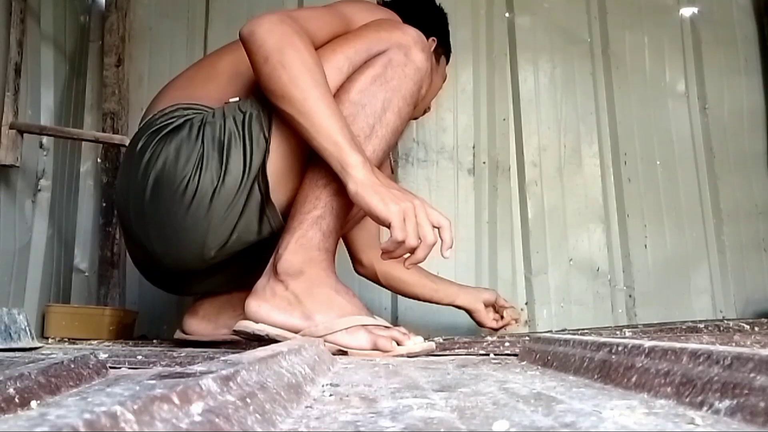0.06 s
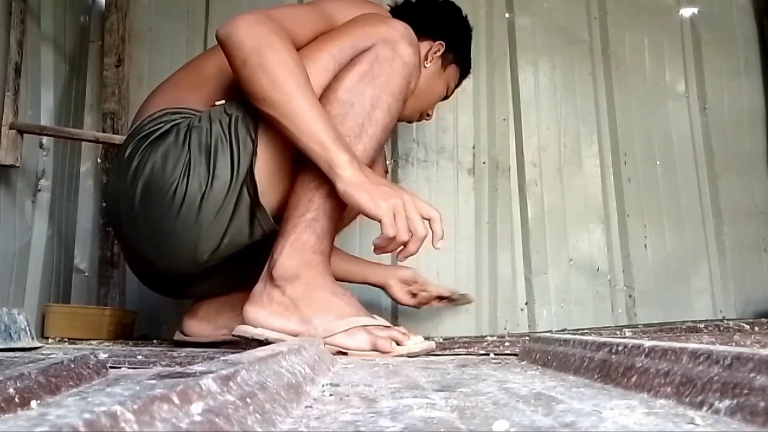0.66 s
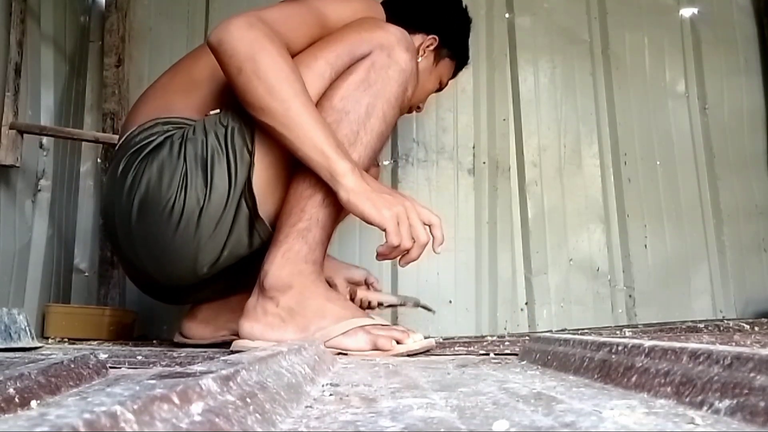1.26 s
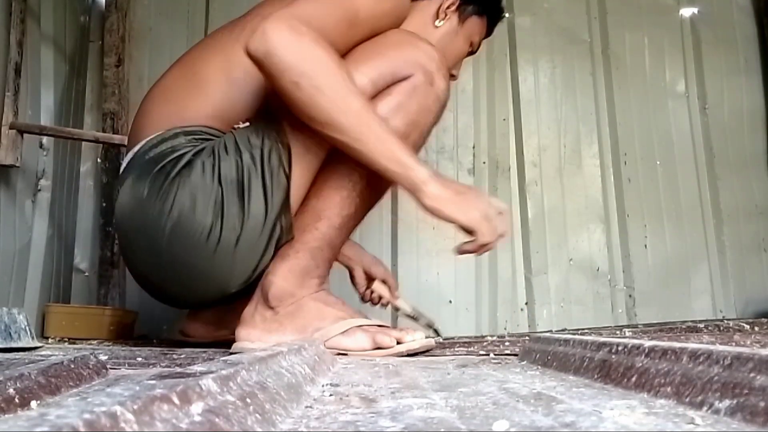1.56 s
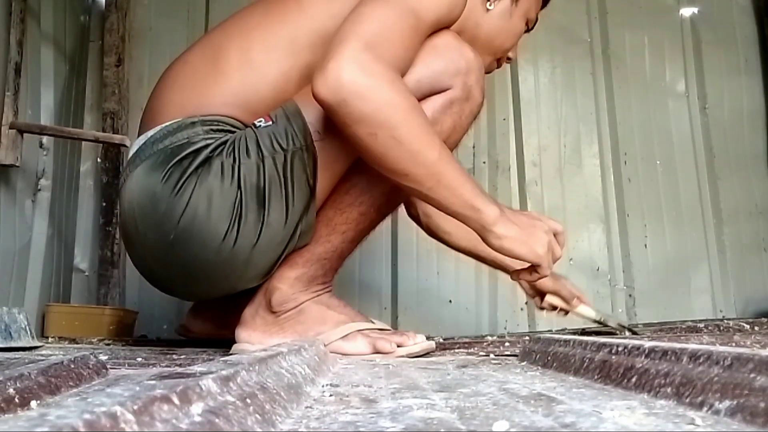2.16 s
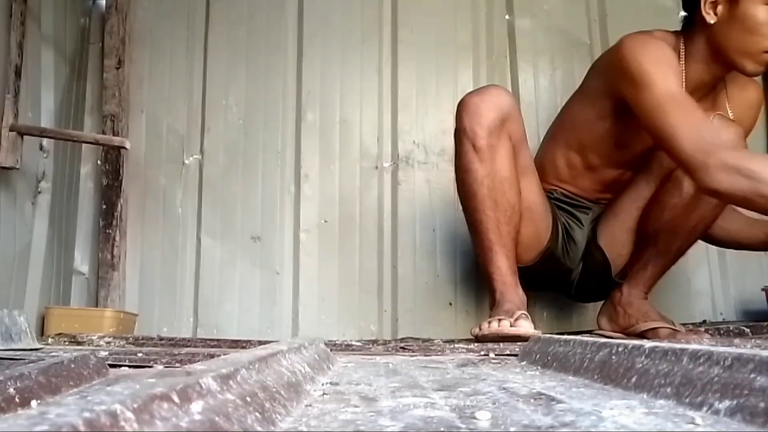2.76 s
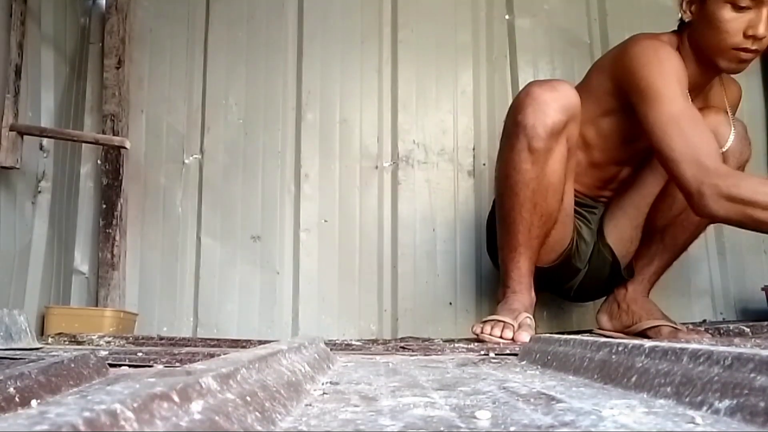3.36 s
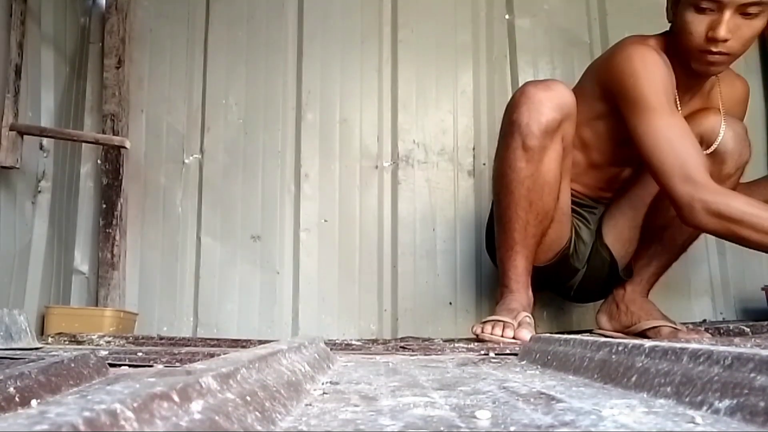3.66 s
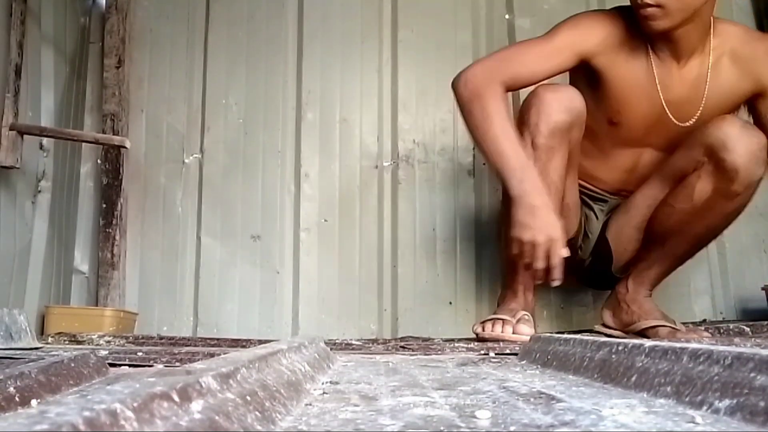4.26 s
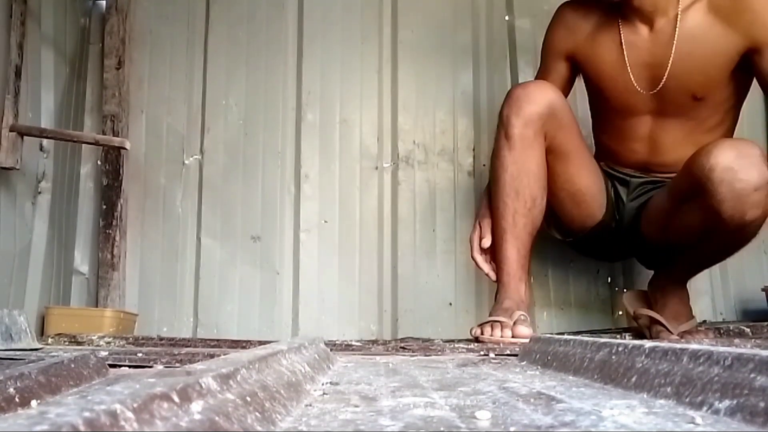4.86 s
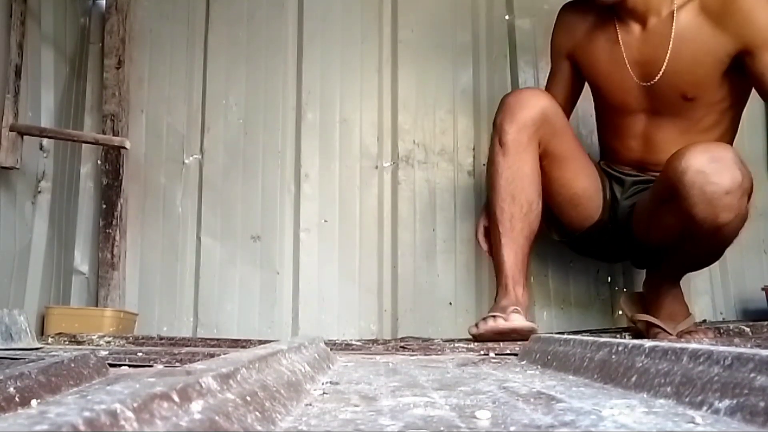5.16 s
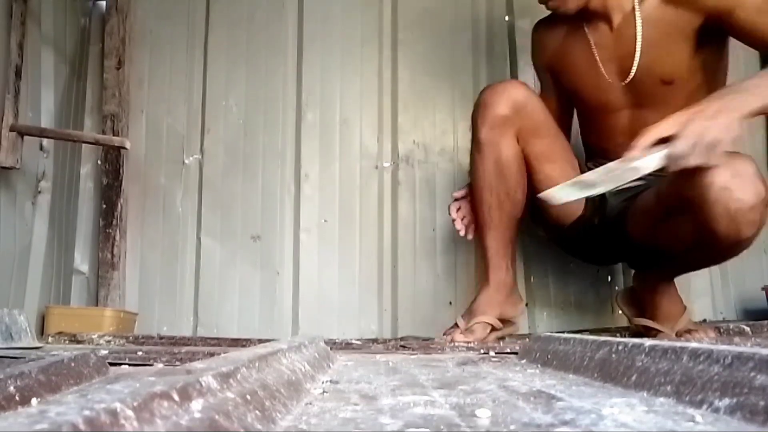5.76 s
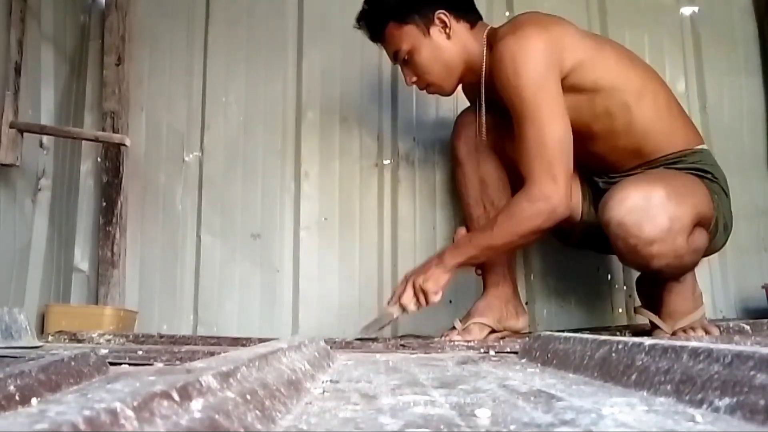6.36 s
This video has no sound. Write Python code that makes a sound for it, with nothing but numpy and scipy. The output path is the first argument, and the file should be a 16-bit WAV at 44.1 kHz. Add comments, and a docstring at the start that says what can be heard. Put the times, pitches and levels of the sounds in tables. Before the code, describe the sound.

A hand scraper works dried crust off a sheet-metal floor, heard nearby in a small metal-walled bird loft that rings briefly after each contact. It opens with a sharp knock and two quick rasps, followed by a sandal scuff and very faint chirps around 1 second. From 1.2 to 2.7 seconds come short gritty strokes and taps, the blade sometimes ringing, strongest near 2 and 2.6 seconds. More knocks and brief scrapes follow from 3.1 to 4 seconds, with tiny snaps of breaking crumbs. A firm knock lands at 4.6 seconds, and the edge gives one brief, very high squeak at about 4.8. Between 5.3 and 6.1 seconds sandals slide and thud softly on the sheet among light blade taps. Firm scrapes return at 6.2 seconds, with a last knock and short rasp near 6.6. A quiet low rumble runs underneath.

```python
"""In a small bird loft, a hand scraper works dried droppings off the ribbed sheet-metal floor.
Impacts excite the modes of blade and sheet; stick-slip friction makes the strokes rasp and the edge
squeal once. Crumbs snap off by brittle fracture, and sandals slide and press on the sheet.
Floor and metal walls ring after the contacts, over faint chirps and a low rumble."""
import sys
import numpy as np
from scipy import signal
from scipy.fft import rfft, irfft, next_fast_len
from scipy.io import wavfile
from scipy.ndimage import uniform_filter1d

SR = 44100
rng = np.random.default_rng(int(sys.argv[2]) if len(sys.argv) > 2 else 0)


def dump_mix(stems):
    """Bounce the given channels to the path in sys.argv[1] as a 16-bit WAV at rate SR."""
    frames = np.atleast_2d(stems).T  # one column per channel
    limited = np.clip(frames, -1, 1)  # hard clip at full scale
    pcm = np.round(limited * 32767).astype(np.int16)
    wavfile.write(sys.argv[1], SR, pcm)


N = 291501
TIME = np.arange(N) / SR
RING = 3 * SR // 4  # samples in an impulse response

# Levels are relative within each table.
# low rumble: (frequency [Hz], level [dB])
RUMBLE_SPECTRUM = [(25, -10), (50, 3.5), (125, 1), (200, -10), (400, -24), (800, -38.5), (1350, -22.5),
                   (2200, -31), (8000, -42), (11000, -50)]
# faint chirps: (time [s], duration [s], start pitch [Hz], end pitch [Hz], level [dB])
CHIRP_NOTES = [(0.757, 0.091, 2840, 2720, -67), (0.865, 0.083, 1300, 1327, -56),
               (0.87, 0.034, 3010, 2920, -68.5), (0.962, 0.031, 2920, 2940, -64),
               (0.967, 0.172, 1207, 1094, -57), (2.72, 0.057, 3750, 3470, -66.5),
               (3.625, 0.068, 4330, 4120, -75.5)]
# reverberation of the walls: (frequency [Hz], T60 [s])
WALL_T60 = [(70, 0.42), (200, 0.61), (450, 0.72), (1470, 0.32), (3900, 0.41), (10000, 0.23)]
# modes of the floor sheet: (frequency [Hz], level [dB], T60 [s])
FLOOR_MODES = [(63, -12, 1.4), (132, -12.5, 0.7), (354.3, -10.5, .7), (383.4, -8.5, 0.49), (466, -9.5, .5),
               (894, -21, 0.15), (1260, -20, 0.22), (1560, -27.5, 0.42), (1832, -12, 0.26),
               (4500, -11, 0.087)]
# base spectrum of a floor contact: (frequency [Hz], level [dB])
CONTACT_SPECTRUM = [(21, -37), (35, -18.5), (122, -4), (166, -4.5), (276, -2.5), (384, -1.5), (674, -5.5),
                    (785, -3), (1010, -6), (1310, -4), (2180, -14.5), (6680, -32), (8410, -30),
                    (10300, -47), (15500, -43)]
# floor patches worked in turn: (start [s], flexing thump [dB], panel boom [dB], panel resonance [Hz])
PATCHES = [(0, -16, 1.5, 358), (.11, -5, 4.5, 1070), (.45, 5.5, 5, 1280), (1.1, -5, 1, 364),
           (1.95, 0, 3.5, 456), (2.1, -8, -3, 1195), (3.2, -4, -1, 1165), (3.7, -0.5, 1.5, 1220),
           (4.55, 6, 1.5, 241), (4.7, -4.5, -7, 1270), (6.18, -10.5, 1.5, 427), (6.26, -9, -9.5, 1590),
           (6.5, -16, 3.5, 375)]
# soles sliding: (time [s], duration [s], level [dB], brightness [dB])
SOLE_SLIDES = [(0.531, 0.15, -47, -3.5), (2.40, 0.13, -43, -3.5), (3.015, .15, -51.5, -11),
               (4.03, 0.23, -71.5, -4), (5.051, 0.2, -67, 3.5), (5.36, .3, -52, 0.5),
               (5.69, 0.28, -44.5, 0.5), (5.86, .25, -46, 2), (6.128, 0.056, -47.5, 1)]
# weight coming down through sandal or hand: (time [s], level [dB], boom [dB])
WEIGHT_SHIFTS = [(3.745, -43.5, -7), (4.602, -45.5, 10), (5.36, -53, 1), (5.423, -46.5, 16),
                 (5.512, -52, 7), (5.643, -48, -4), (5.824, -47.5, 4), (5.968, -41, 2.5)]
# crumbs breaking off: (time [s], level [dB])
CRUMB_SNAPS = [(0.72, -61.5), (0.804, -60), (0.869, -64.5), (0.979, -58.5), (1.358, -57), (1.756, -56),
               (1.838, -55.5), (2.494, -50), (2.704, -53.5), (3.075, -56.5), (3.441, -44), (3.945, -48),
               (5.751, -51.5), (5.837, -49)]
# spectrum of a snap: (frequency [Hz], level [dB])
SNAP_SPECTRUM = [(300, -31), (1500, 4.0), (4000, -6.5), (8500, -5.5), (10000, -21.5), (15000, -18.5)]
# modes of the thin edge: (frequency [Hz], half-width [Hz], level [dB])
SQUEAL_MODES = [(7900, 88, 2), (8340, 180, -27), (8000, 630, -2), (8600, 120, 3)]
# modes of the freely held blade: (frequency [Hz], level [dB], T60 [s])
FREE_BLADE_MODES = [(1007, 7.5, 0.28), (1690, 8.5, 0.15), (2098, 4.5, .19), (2554, 8.5, 0.12),
                    (2620, -14.5, .15), (3970, -4.5, .25), (5180, -6, .16), (5720, -8.5, .18),
                    (7230, -0.5, 0.14), (8000, -5.5, 0.049)]
# blade set down: (time [s], level [dB], brightness [dB], blade ring [dB])
BLADE_KNOCKS = [(.043, -38, 4.5, -1.5), (.174, -26.5, -2.5, -27.5), (1.202, -52, 19.5, 10.5),
                (1.269, -50, -16, -11.5), (1.48, -48.5, -1.5, -7), (1.603, -38, 5, 2),
                (1.655, -44.5, 3, -4), (2.008, -32.5, 2.5, -17), (2.569, -35, 3, -23),
                (2.918, -61.5, -8.5, -20), (3.139, -47.5, -3.5, -19), (3.249, -30, -17.5, -34),
                (3.367, -34.5, -1, -27), (3.753, -36, -2, -30), (4.603, -30, 2, -26), (4.843, -37, -6, -26),
                (5.689, -44.5, 6.5, -14), (5.914, -38.5, -2.5, -24), (6.214, -45, 9.5, -4),
                (6.555, -32.5, 2, -27)]
# blade pushed: (time [s], duration [s], level [dB], swell from start to end [dB], brightness [dB])
BLADE_STROKES = [(.05, 0.062, -37.5, 0, -2), (.122, .075, -35, 0.5, -1), (0.494, .075, -58, 21, 0),
                 (1.207, 0.2, -39.5, -14.5, -7.5), (1.48, 0.022, -62, -3, -1),
                 (1.615, 0.16, -40.5, -11, -7.5), (1.84, .04, -51.5, 1, 4.5),
                 (2.016, 0.12, -30.5, -17, 0.5), (2.112, 0.2, -44, -4.5, 5),
                 (2.289, 0.073, -42.5, 4.5, 1.5), (2.406, 0.17, -44.5, -11, -2.5),
                 (2.565, 0.1, -34.5, -9.5, .5), (3.292, 0.035, -46, 2, 7), (3.367, 0.064, -32, -10, -2),
                 (3.76, 0.075, -37, -5, 2.5), (3.88, .1, -45.5, -3, 0), (4.51, 0.13, -58.5, -5.5, -0.5),
                 (4.607, 0.033, -35.5, 1, 0), (4.767, 0.34, -49.5, -24, 11), (6.21, 0.067, -37, 3, 0.5),
                 (6.277, 0.12, -33, -4, 3), (6.558, 0.029, -26, -16.5, -2)]
# noise gate: (frequency [Hz], threshold [dB])
GATE_THRESHOLDS = [(150, -89), (600, -77.5), (1350, -68.5), (2200, -60), (4000, -65.5), (8000, -81),
                   (12000, -88)]


def undb(db):
    """Amplitude ratio of a level in decibels."""
    return 10 ** (np.asarray(db) / 20)


def unit(x):
    """Normalisation to rms 1."""
    return x / np.sqrt(np.mean(x ** 2))


def unit_energy(x):
    """Normalisation to energy 1."""
    return x / np.linalg.norm(x)


def over_hz(points, hz):
    """Interpolation of (Hz, value) points on a log-frequency axis."""
    f, value = np.transpose(points)
    return np.interp(np.log(np.maximum(hz, 1)), np.log(f), value)


def colour(x, gain):
    """Minimum-phase filtering with magnitude gain(Hz), by folding the cepstrum."""
    size = 2 * next_fast_len(len(x) // 2 + 1)
    cepstrum = irfft(np.log(gain(np.fft.rfftfreq(size, 1 / SR)) + 1e-9))
    cepstrum[1:size // 2] *= 2
    cepstrum[size // 2 + 1:] = 0
    return irfft(rfft(x, size) * np.exp(rfft(cepstrum)))[:len(x)]


def add(out, s, x):
    """Superposition of x on out at time s."""
    i = max(int(s * SR), 0)
    out[i:i + len(x)] += x[:max(N - i, 0)]


def wander(size, rate):
    """Random modulation: Gaussian values, rate per second, joined by lines."""
    at = np.arange(size) * rate / SR
    points = rng.standard_normal(int(at[-1]) + 2)
    return np.interp(at, np.arange(len(points)), points)


def mode(hz, t60):
    """Free vibration of a damped oscillator, with unit energy."""
    t = np.arange(RING) / SR
    return unit_energy(np.sin(2 * np.pi * hz * t) * 1000 ** (-t / t60))


def rumble(level_db=-54, suppress_db=-9, suppress_from_s=4.22, suppress_to_s=5.13, fade_s=0.15):
    """Filtered noise: a low wavering rumble; a timed dip stands for the phone's noise suppression."""
    outside_s = np.maximum(suppress_from_s - TIME, TIME - suppress_to_s)
    suppression = np.clip(1 - outside_s / fade_s, 0, 1)
    db = level_db + suppress_db * suppression + 0.83 * wander(N, 11)
    noise = colour(rng.standard_normal(N), lambda f: undb(over_hz(RUMBLE_SPECTRUM, f)))
    return undb(db) * unit(noise)


def chirps(response, waver=0.033, flutter_db=4, fade_db_per_s=80):
    """Random frequency and amplitude modulation makes short whistles hoarse; reverberation blurs them."""
    out = np.zeros(N)
    for s, length, start_hz, end_hz, db in CHIRP_NOTES:
        size = int(length * SR)
        hz = np.linspace(start_hz, end_hz, size) * (1 + waver * wander(size, 510))
        envelope = undb(flutter_db * wander(size, 200) - fade_db_per_s * TIME[:size])
        envelope *= signal.windows.tukey(size, .2)
        note = unit(envelope * np.sin(2 * np.pi * np.cumsum(hz) / SR))
        heard = signal.fftconvolve(note, response())
        heard[:size] += note
        add(out, s, undb(db) * np.linalg.norm(note) * unit_energy(heard))
    return out


def loft(early_t60=.13, late_db=-7, direct=0.28, build_s=0.00047):
    """Diffuse decay plus floor modes: returns a function drawing a new spot's impulse response."""
    t = np.arange(RING) / SR
    centres = np.geomspace(SR / 700, SR / 3, num=9)
    size = 4 * SR
    noise = rfft(rng.standard_normal(size))
    log_hz = np.log(np.fft.rfftfreq(size, 1 / SR) + 1)
    bands, fades = [], []
    for hz, weights in zip(centres, np.eye(len(centres))):
        bands.append(irfft(noise * np.interp(log_hz, np.log(centres), weights)))
        # the sheet under the hand dies fast; the walls ring on, longest in the low midrange
        fade = np.hypot(1000 ** (-t / early_t60), undb(late_db) * 1000 ** (-t / over_hz(WALL_T60, hz)))
        fade *= 1 - np.exp(-t / build_s)  # bending waves take a moment to spread
        fades.append(unit_energy(fade))
    modes = np.array([undb(db) * mode(hz, t60) * np.sqrt(hz / SR / 2) for hz, db, t60 in FLOOR_MODES])

    def response():
        i = rng.integers(size - RING)
        ring = sum(band[i:i + RING] * fade for band, fade in zip(bands, fades))
        ring[0] += direct
        return ring + rng.choice([-1, 1], len(modes)) @ modes  # mode signs differ from spot to spot
    return response


def pressed(ring, grip_s=0.097):
    """Contact damping: a pressing hand or foot speeds the sheet's early decay."""
    return unit_energy(ring * (1 + np.exp(-TIME[:RING] / grip_s)))


def contact(force, ring, thump_db, boom_db, bright_db, panel_hz, panel_db=6, log_width=0.11):
    """Forced vibration: weight brings out the bass, the edge the treble, the spot one panel resonance."""
    touch = [(165, thump_db), (290, boom_db), (480, boom_db), (900, 0.021), (1600, 0.0076),
             (3000, bright_db), (12000, bright_db + 3.5)]
    midrange_db = np.mean(over_hz(CONTACT_SPECTRUM, np.arange(700, 2200, 100)))

    def gain(f):
        panel = panel_db * np.exp(-(np.log((f + 1) / panel_hz) / log_width) ** 2)
        return undb(over_hz(CONTACT_SPECTRUM, f) - midrange_db + over_hz(touch, f) + panel)
    return colour(signal.fftconvolve(force, ring)[:RING], gain)


def patch(s):
    """Response depends on the driving point: thump, boom and resonance under the blade at time s."""
    return PATCHES[sum(row[0] <= s for row in PATCHES[1:])][1:]


def slips(size, rate, spread_db):
    """Stick-slip as a Poisson process: random impulses with heavy-tailed strengths."""
    chance = rng.random((size, 2))
    slipping = chance[:, 0] < rate / SR
    strength = undb(-spread_db * np.log(np.maximum(chance[:, 1], .02)))
    return unit(slipping * strength * rng.choice([-1, 1], size) + 1e-9)


def friction(push, judder_db=3, grit_rate=70, grit_db=-5, grit_hz=3000):
    """Sliding friction: the contact catches and slips while hard grains crack under it."""
    size = len(push)
    grain = slips(size, rate=2400, spread_db=4.0) * undb(judder_db * wander(size, 170))
    cracks = (rng.random(size) < grit_rate / SR) * rng.standard_normal(size)
    treble = signal.butter(2, grit_hz, "high", fs=SR, output="sos")
    grit = signal.sosfilt(treble, cracks) * np.sqrt(SR / grit_rate)
    return unit(push * grain) * np.sqrt(np.mean(push ** 2)) + undb(grit_db) * push * grit


def arch(length):
    """Soft contact: a half-sine pulse of force."""
    return np.sin(np.linspace(0, np.pi, int(length * SR)))


def sandals(response, slide_gain_db=9, press_gain_db=41, press_s=0.029):
    """Friction of soles on grit gives scuffs; brief loading of the sheet gives soft thuds."""
    out = np.zeros(N)
    for s, length, db, bright_db in SOLE_SLIDES:
        force = friction(arch(length))
        scuff = contact(force, response(), thump_db=9, boom_db=7.5, bright_db=bright_db, panel_hz=1254)
        add(out, s, undb(db + slide_gain_db) * scuff)
    for s, db, boom_db in WEIGHT_SHIFTS:
        force = unit_energy(friction(arch(press_s)))
        ring = pressed(response())
        thud = contact(force, ring, thump_db=20, boom_db=boom_db, bright_db=-4, panel_hz=116.2)
        add(out, s, undb(db + press_gain_db) * thud)
    return out


def crumbs(response, crack_s=0.0013, gain_db=36):
    """Brittle fracture: the crust breaks in tiny clusters of bright clicks."""
    out, t = np.zeros(N), TIME[:SR // 25]
    for s, db in CRUMB_SNAPS:
        force = unit_energy(slips(len(t), rate=2000, spread_db=0.93) * np.exp(-t / crack_s))
        snap = signal.fftconvolve(force, response()[:RING // 3])
        add(out, s, undb(db + gain_db) * colour(snap, lambda f: undb(over_hz(SNAP_SPECTRUM, f))))
    return out


def squeal(peak_s=4.846, hold_s=0.023, level_db=-37, rise_db_per_s=510, fall_db_per_s=374):
    """Friction-excited resonance: fast slips ring a tight cluster of the thin blade's modes."""
    def edge(f):
        powers = (undb(db) ** 2 / (1 + ((f - hz) / width) ** 2) ** 2 for hz, width, db in SQUEAL_MODES)
        return np.sqrt(sum(powers))
    t = TIME - peak_s
    db = level_db - rise_db_per_s * np.maximum(-t, 0) - fall_db_per_s * np.maximum(t - hold_s, 0)
    return undb(db) * unit(colour(slips(N, rate=3000, spread_db=1.2), edge))


def impact(chatter_s=0.011, chatter=1.74):
    """Impulsive force: one sharp push, then a decaying chatter."""
    t = TIME[:SR // 25]
    force = chatter * unit_energy(slips(len(t), rate=2500, spread_db=3.05) * np.exp(-t / chatter_s))
    force[0] += 1
    return unit_energy(force)


def knocks(response, floor_gain_db=41, blade_gain_db=29, detune=0.004):
    """Impact excitation: one force rings both the floor and the freely held blade."""
    out = np.zeros(N)
    for s, db, bright_db, ring_db in BLADE_KNOCKS:
        thump_db, boom_db, panel_hz = patch(s)
        force = impact()
        floor = contact(force, pressed(response()), thump_db, boom_db, bright_db, panel_hz)
        add(out, s, undb(db + floor_gain_db) * floor)
        # the grip detunes the blade a little at every blow
        blade = sum(undb(mode_db) * mode(hz * (1 + detune * rng.standard_normal()), t60)
                    for hz, mode_db, t60 in FREE_BLADE_MODES)
        add(out, s, undb(db + ring_db + blade_gain_db) * signal.fftconvolve(force, unit_energy(blade)))
    return out


def effort(length, swell_db, attack_s, release_s):
    """Force envelope: a push bites, swells or sags while held, then relaxes exponentially."""
    t = TIME[:RING]
    held = undb(swell_db * np.minimum(t / length, 1))
    return np.minimum(t / attack_s, 1) * held * np.exp(-np.maximum(t - length, 0) / release_s)


def strokes(response, gain_db=11, attack_s=0.0088, drag_db=-10.5, drag_top_hz=1940):
    """Stick-slip friction: the pushed edge rasps through the crust, then drags on, faint and dull."""
    out = np.zeros(N)
    dull = signal.butter(2, drag_top_hz, fs=SR, output="sos")
    for s, length, db, swell_db, bright_db in BLADE_STROKES:
        thump_db, boom_db, panel_hz = patch(s)
        force = friction(effort(length, swell_db, attack_s, release_s=0.0083))
        drag = signal.sosfilt(dull, friction(effort(attack_s, 0, attack_s, release_s=0.081)))
        end = int(length * SR)
        force[end:] += undb(swell_db + drag_db) * drag[:RING - end]
        rasp = contact(force, response(), thump_db, boom_db, bright_db, panel_hz)
        add(out, s, undb(db + gain_db) * rasp)
    return out


def scene():
    """Linear superposition of the sources; contacts and chirps share one floor and its walls."""
    response = loft()
    contacts = knocks(response) + strokes(response) + sandals(response) + crumbs(response)
    return (contacts + squeal() + chirps(response) + rumble())[None]


def noise_gate(x, depth_db=-12, size=1024):
    """Spectral gating: bands whose smoothed power falls below a threshold are attenuated."""
    hz, _, spectra = signal.stft(x, SR, nperseg=size)
    power = uniform_filter1d(np.abs(spectra) ** 2 * size, size=9, axis=-2)  # across frequency
    power = np.maximum(uniform_filter1d(power, size=3, axis=-1), 0)  # across time
    passed = power / (power + undb(over_hz(GATE_THRESHOLDS, hz))[:, None] ** 2)
    return signal.istft(spectra * np.maximum(passed, undb(depth_db)), SR, nperseg=size)[1][..., :N]


def record(dry):
    """The phone's gating hushes the faint tails; a steep low-pass limits the bandwidth."""
    low_pass = signal.ellip(10, .2, 70, 15700, fs=SR, output="sos")
    return signal.sosfilt(low_pass, noise_gate(dry))


dry = scene()
out = record(dry)
dump_mix(out)
```